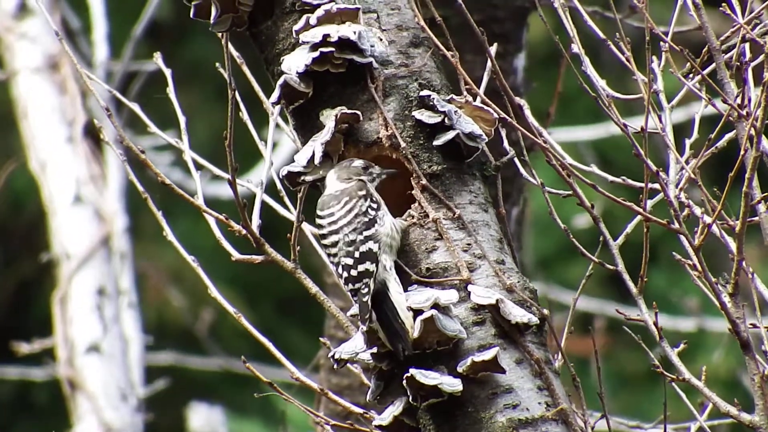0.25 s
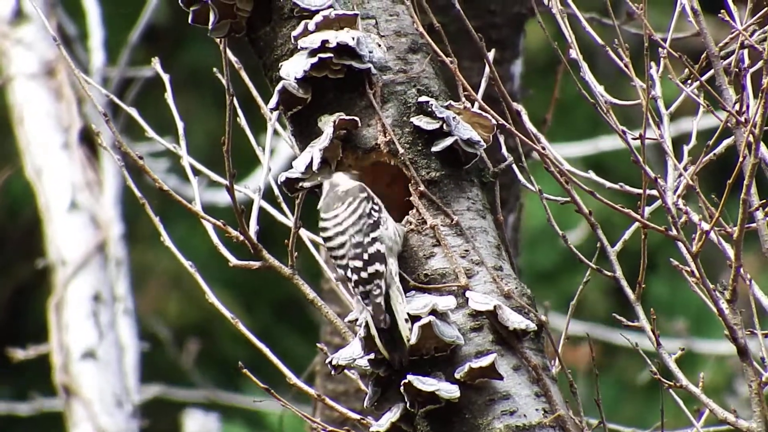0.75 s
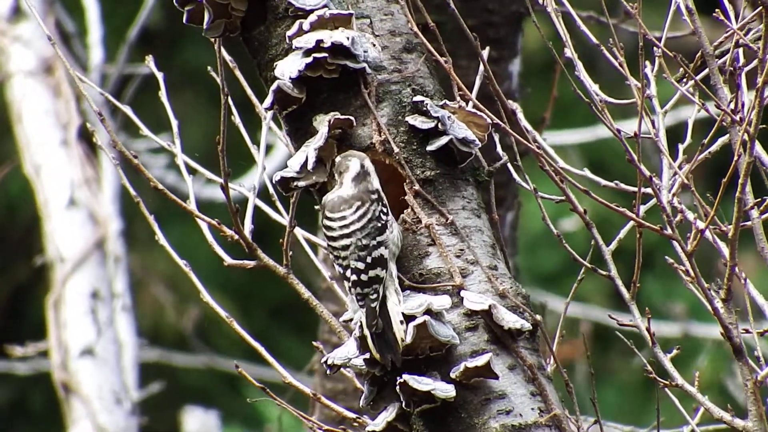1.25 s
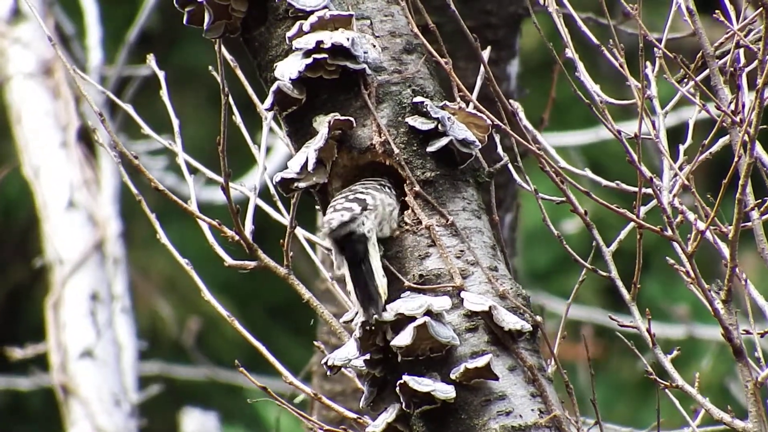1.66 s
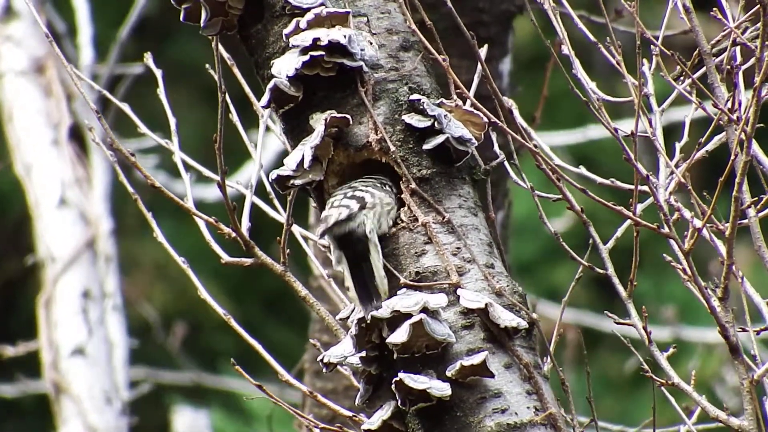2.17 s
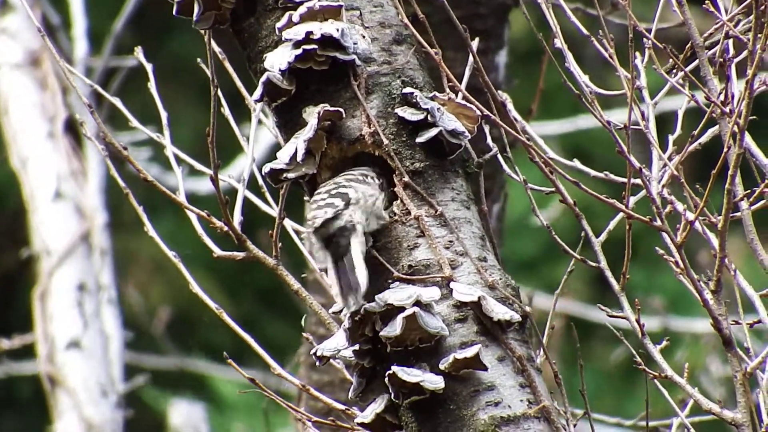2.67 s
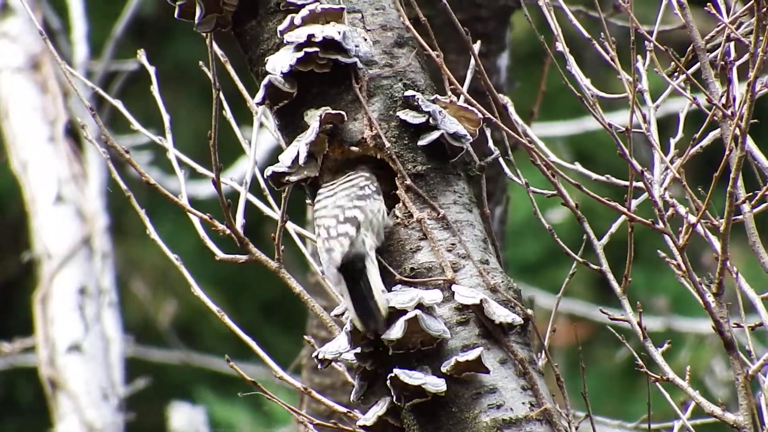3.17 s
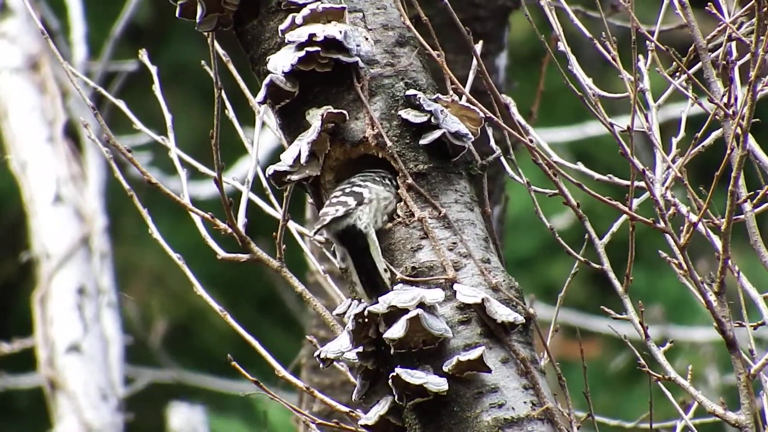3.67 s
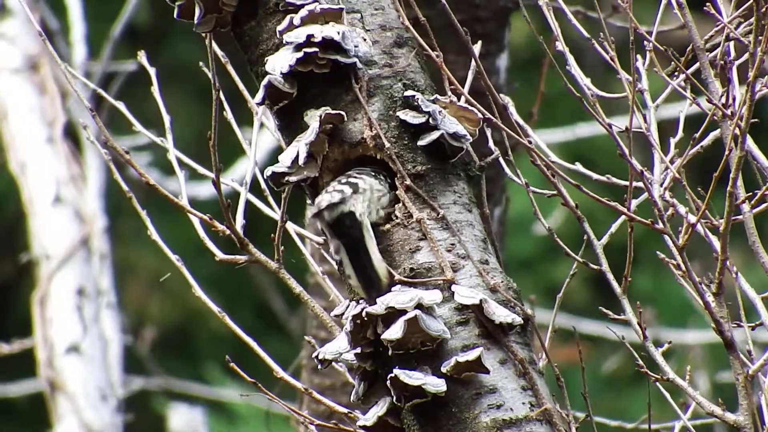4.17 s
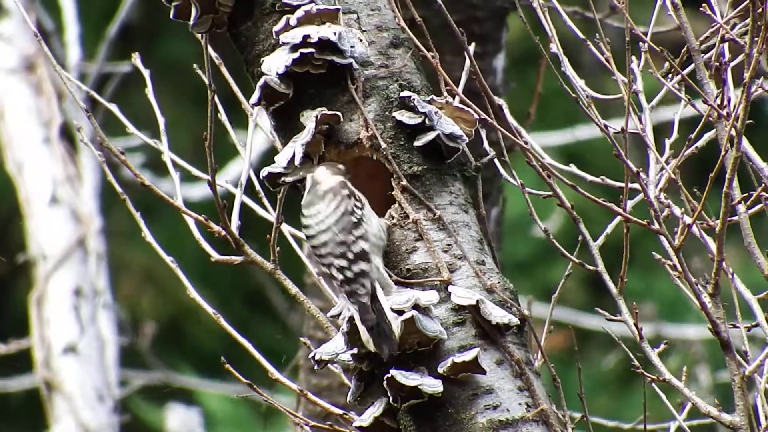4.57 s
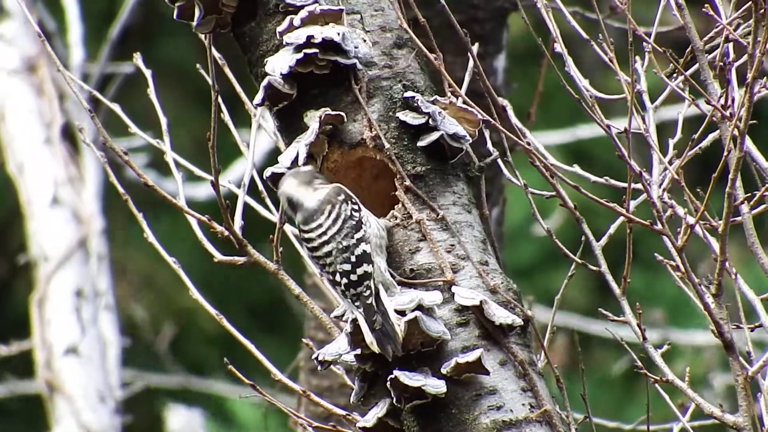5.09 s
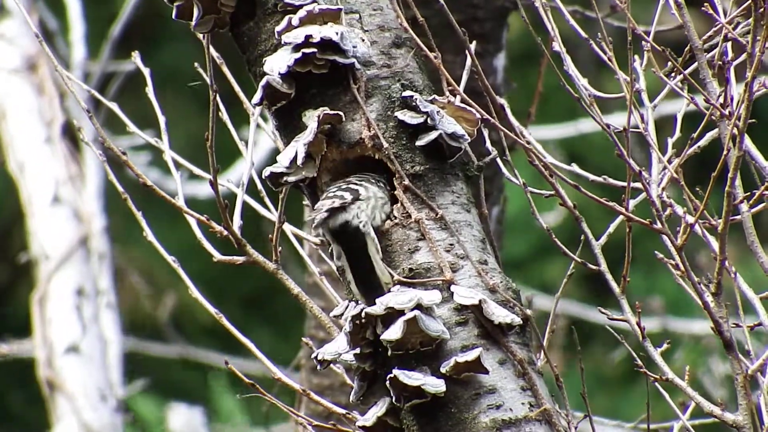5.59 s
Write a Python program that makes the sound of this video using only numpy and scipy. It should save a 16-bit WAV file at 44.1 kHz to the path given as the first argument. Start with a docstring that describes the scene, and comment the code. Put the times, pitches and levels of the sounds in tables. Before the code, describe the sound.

Outdoors among trees, small birds whistle, chirp and buzz throughout over a steady, slightly growing rush, with blurred distant birdsong behind. Light wind flutters and thuds at the microphone, mostly around two to three seconds. A small woodpecker is nearly silent until about five seconds, when several soft, hollow knocks come in a quick uneven cluster with faint claw scrapes. The stereo sound is dull on top, with slight hiss.

```python
"""Songbirds twitter among the trees over a steady outdoor rush, and a light breeze buffets the microphone ports.
A small woodpecker knocks a few times on the rim of its hole in a soft, hollow trunk, its claws scraping bark.
Bird notes are gliding sines, knocks are struck trunk modes, and rush, breeze and scrapes are shaped noise.
The camera's sound is dull above 4 kHz, has two narrow notches and a faint hiss of its own."""
import sys
import numpy as np
from scipy import signal
from scipy.fft import rfft, irfft, next_fast_len
from scipy.io import wavfile
from scipy.ndimage import map_coordinates

SR = 44100
rng = np.random.default_rng(int(sys.argv[2]) if len(sys.argv) > 2 else 0)


def unload_audio(sound):
    """Save the sound as a 16-bit wav file, at the path given as the first command line argument."""
    columns = np.transpose(np.atleast_2d(sound))
    # keep every value between -1 and 1, then stretch to whole-number steps
    steps = np.round(np.clip(columns, -1, 1) * 32767)
    wavfile.write(sys.argv[1], SR, steps.astype(np.int16))


N = 257632
TIME = np.arange(N) / SR


def undb(db):
    """Decibels to gain."""
    return 10 ** (np.asarray(db) / 20)


def unit(x):
    """Scale to rms 1."""
    return x / np.sqrt(np.mean(x ** 2) + 1e-18)


def colour(x, points):
    """Filter by a spectrum of (Hz, dB) points, joined by straight lines over log frequency."""
    hz, db = np.transpose(points)
    size = next_fast_len(x.shape[-1] + 2048)
    bins = np.maximum(np.fft.rfftfreq(size, 1 / SR), 1)
    gain = undb(np.interp(np.log(bins), np.log(hz), db))
    return irfft(rfft(x, size) * gain, size)[..., :x.shape[-1]]


def walk(rate, size=N):
    """Smooth random wandering with a spread near 1, through `rate` random steps a second."""
    steps = rng.standard_normal(2048)
    return map_coordinates(steps, [np.arange(size) * rate / SR], order=2, mode="wrap")


def add(track, s, sound):
    """Mix a sound into a track at a time in seconds."""
    i = max(int(s * SR), 0)
    track[i:i + len(sound)] += sound[:max(N - i, 0)]


def woods(x, t60, wet_db, gap_s):
    """Trunks scatter a fading cloud of echoes that reaches both ports nearly alike."""
    t = TIME[:SR]
    # the echoes build up over the gap, then fade by 60 dB in t60 seconds
    fade = undb(-60 * t / t60) * (1 - np.exp(-(t / gap_s) ** 2))
    mid, side = rng.standard_normal((2, SR)) * fade / np.sqrt(np.sum(fade ** 2))
    echoes = [signal.fftconvolve(x, mid + sign * 0.12 * side)[:N] for sign in (1, -1)]
    return x + undb(wet_db) * np.array(echoes)


def progress(length):
    """Run from 0 to 1 over a length in seconds."""
    return np.linspace(0, 1, int(length * SR))


def note(glide, db, trill_hz, waver=0.0079, flutter_db=2.5, uneven=0.206):
    """One bird note: a sine on a pitch path; the deeper its trill, the more it pulses."""
    trill_rate_hz, trill_pulse_db_per_hz = 68, 0.0115
    edge_s = 0.0068  # attack and release
    size = len(glide)
    rate = trill_rate_hz * (1 + uneven * walk(49.4, size))
    trill = trill_hz * np.sin(2 * np.pi * (rng.random() + np.cumsum(rate) / SR))
    hz = glide * (1 + waver * walk(244.0, size)) + trill
    edges = signal.windows.tukey(size, min(2 * edge_s * SR / size, 1))
    # the note dips wherever the trill lifts its pitch
    swell = edges * undb(db + flutter_db * walk(108, size) - trill_pulse_db_per_hz * trill)
    return swell * np.sin(2 * np.pi * np.cumsum(hz) / SR)


def songbirds(pan_db=-3.0):
    """Arched calls, gently bowed whistles and straight buzzes, all echoing among the trees."""
    # Arched calls. Each row: start in seconds, length in seconds, top in Hz,
    # opening level in dB, closing level in dB (both as at the foot pitch).
    arches = [(1.143, .146, 5600, -42, -43.5), (1.472, .178, 6700, -39, -47.5)]
    # Every arch leaps up, climbs on slowly and drops back.
    # Each row: share of its length, share of its rise from foot to top.
    arch_shape = [(0, 0.07), (.09, .52), (.21, .69), (.54, 1), (.74, .9), (.85, .37), (1, 0.026)]
    # Slurred whistles. Each row: start in seconds, length in seconds, first Hz, last Hz, level in dB.
    whistles = [(0, 0.023, 3900, 3720, -41), (0.092, 0.099, 4130, 4260, -47.5),
                (0.309, 0.069, 4390, 4030, -43.5), (0.464, 0.053, 3530, 3595, -43),
                (1.704, .075, 4300, 5350, -46), (2.035, 0.042, 3400, 3400, -46.5),
                (2.427, 0.069, 3090, 3200, -48.5), (2.507, 0.1475, 3220, 3396, -42),
                (2.712, 0.063, 2865, 3640, -40), (2.777, 0.092, 3810, 4060, -43.5),
                (3.214, 0.057, 4350, 4170, -47.5), (3.294, .092, 4450, 4190, -41),
                (3.381, 0.044, 4300, 3670, -42), (3.76, 0.153, 4220, 4510, -48),
                (4.82, .05, 4174, 3570, -41.5), (4.86, .24, 3790, 4370, -46.5),
                (5.102, 0.25, 4610, 4460, -44.5), (5.359, 0.081, 3555, 4354, -42.5),
                (5.653, 0.099, 3666, 4330, -42.5)]
    # Buzzy trills. Each row: start in seconds, length in seconds, first Hz, last Hz, level in dB.
    buzzes = [(.185, 0.064, 4270, 4030, -46.5), (1.777, 0.14, 4090, 4130, -45),
              (1.798, 0.079, 3460, 3160, -43), (2.288, 0.069, 3565, 3800, -47.5),
              (2.773, 0.14, 3450, 3406, -47.5), (2.982, 0.078, 4110, 4920, -45),
              (3.883, 0.2, 3990, 4240, -48.5), (4.202, .22, 3030, 3460, -51),
              (4.471, .12, 3755, 4760, -45.5), (4.647, 0.11, 3875, 3650, -46),
              (4.928, 0.136, 3610, 3470, -49), (5.444, 0.16, 4136, 4050, -47.5)]
    arch_foot_hz, arch_trill_hz = 2310, 61
    arch_db_per_hz = -.0003  # the call weakens as it climbs
    whistle_bow_hz = 91  # lift in the middle of a note
    whistle_trill_hz_per_s = 670  # the longer a whistle, the deeper its trill
    buzz_trill_hz = 293  # depth

    out = np.zeros(N)
    for s, length, top, opening_db, closing_db in arches:
        u = progress(length)
        rise = (top - arch_foot_hz) * np.interp(u, *np.transpose(arch_shape))
        db = opening_db + (closing_db - opening_db) * u + arch_db_per_hz * rise
        add(out, s, note(arch_foot_hz + rise, db, arch_trill_hz))
    for s, length, first, last, db in whistles:
        u = progress(length)
        glide = first + (last - first) * u + whistle_bow_hz * np.sin(np.pi * u)
        add(out, s, note(glide, db, whistle_trill_hz_per_s * length))
    for s, length, first, last, db in buzzes:
        glide = first + (last - first) * progress(length)
        add(out, s, note(glide, db, buzz_trill_hz, waver=0.0261))
    balance = undb(np.array([[pan_db], [-pan_db]]) / 2)
    return woods(out, t60=0.36, wet_db=-2, gap_s=0.0025) * balance


def far_birds(swing_db=6, wander_rate=22):
    """Distant song, blurred by the woods into narrow noise bands that come and go."""
    # Loudness of the distant song. Each row: time in seconds, level in dB on the right, ahead of the echoes.
    chorus = [(0, -56), (.9, -58), (1.8, -56.5), (3.1, -49.5), (3.6, -68), (4.2, -51.5), (5, -50.5),
              (5.8, -62)]
    out = 0
    for hz in np.linspace(3200, 4300, 6):
        band_filter = signal.butter(2, [hz * .965, hz * 1.035], "band", fs=SR, output="sos")
        band = signal.sosfilt(band_filter, rng.standard_normal(N))
        out = out + band * undb(swing_db * np.tanh(walk(wander_rate)))
    song = unit(out) * undb(np.interp(TIME, *np.transpose(chorus)))
    return woods(song, t60=0.21, wet_db=-5.5, gap_s=0.01) * undb(np.array([[-3], [0]]))


def rush(start_db=-45.705, pan_db=-1.85, rise_db=1.59):
    """The even outdoor rush: noise that slowly grows, its ports differing most in the lowest part."""
    # Tone of the rush. Each row: frequency in Hz, relative level in dB.
    rush_spectrum = [(80, -16.5), (160, -10.5), (280, -3), (400, 0.16), (560, -1.15), (800, 1.2),
                     (1600, 0.54), (2050, 2.5), (2400, -3), (3100, -0.4), (3900, -0.94), (4600, -4.5),
                     (12000, -14)]
    # How far the ports differ. Each row: frequency in Hz, side over mid in dB.
    rush_width = [(60, 5), (120, -20), (200, -28), (380, -16), (1300, -21.5), (2400, -24.5), (4400, -10.5)]
    mid, side = colour(rng.standard_normal((2, N)), rush_spectrum)
    ports = unit(mid + np.array([[1], [-1]]) * colour(side, rush_width))
    sway_db = .25 * walk(3)
    balance_db = np.array([[pan_db], [-pan_db]]) / 2
    return ports * undb(start_db + rise_db * TIME / TIME[-1] + sway_db + balance_db)


def breeze(patchy_db=6, flutter_rate=24, lee_db=-5):
    """Each port flutters on its own as the breeze swells, less on the lee side; strong eddies thud as they pass."""
    # Strength of the breeze. Each row: time in seconds, level in dB on the windward (left) port.
    gusts = [(0, -75), (.45, -58.5), (.9, -67), (1.95, -59.5), (2.25, -50), (2.85, -51.5), (3.15, -62.5),
             (4.3, -70.5), (5.84, -75)]
    # The strongest eddies. Each row: start in seconds, length in seconds, level in dB,
    # lean to the left in dB (scaled by nearly nine tenths below).
    eddies = [(0.307, 0.019, -52, -12), (0.417, 0.047, -52, -5), (1.393, .021, -48.5, 21),
              (1.485, 0.023, -54, 19), (2.112, 0.02, -56, 21), (2.311, 0.041, -46, 12),
              (2.395, 0.035, -53, 20), (2.639, 0.027, -55, 0), (3.077, 0.016, -41.5, -6),
              (3.09, 0.051, -48, -8.5), (3.247, 0.02, -45.5, -13), (3.516, 0.022, -52, 14),
              (3.595, 0.018, -57, 20), (3.849, 0.014, -60, 16)]
    # Tone of the turbulence. Each row: frequency in Hz, relative level in dB.
    eddy_spectrum = [(60, -8.5), (130, -1.5), (190, 1.5), (300, 0.5), (420, -8.5), (700, -28), (2000, -55)]
    ports, strength_db = [], np.interp(TIME, *np.transpose(gusts))
    for side, shelter_db in ((0.9, 0), (-0.87, lee_db)):
        air = unit(colour(rng.standard_normal(N), eddy_spectrum))
        out = air * undb(strength_db + shelter_db + patchy_db * np.tanh(walk(flutter_rate)))
        for s, length, db, pan_db in eddies:
            puff = air[int(s * SR):][:int(length * SR)]
            thud = unit(puff * signal.windows.tukey(len(puff), .7))
            add(out, s, undb(db + side * pan_db / 2) * thud)
        ports.append(out)
    return np.array(ports)


def woodpecker(tick_s=0.00066, build_s=.0028):
    """The beak ticks on the bark; the hollow trunk swells into a short, dead knock."""
    # Pecks. Each row: start in seconds, peak level of the knock in dB, level of the beak tick in dB,
    # contact time in seconds; levels are on the right, ahead of the echoes.
    pecks = [(.393, -54, -37, .0004), (4.903, -46, -22, .0004), (4.9473, -30, -20.5, 0.00011),
             (5.0501, -30, -18, 0.00039), (5.104, -43, -42, .0006), (5.201, -30.5, -27, 0.00053),
             (5.2767, -43, -47, 0.0025), (5.796, -57, -33, 0.00037)]
    # Ringing modes of the trunk. Each row: frequency in Hz, relative level in dB, 60 dB decay in seconds.
    trunk_modes = [(166, -14, 0.051), (373, -2, 0.028), (422, 11, 0.015), (446, 3.5, 0.024),
                   (706, -0.5, 0.022)]
    # Tone of the beak tick. Each row: frequency in Hz, gain in dB.
    beak_spectrum = [(1500, -23), (4500, -10), (7800, 10), (12000, -1)]
    out, t = np.zeros(N), TIME[:SR // 8]
    ring = sum(undb(db - 60 * t / t60) * np.sin(2 * np.pi * hz * t) for hz, db, t60 in trunk_modes)
    ring = ring * (1 - np.exp(-(t / build_s) ** 2))
    for s, knock_db, tick_db, contact_s in pecks:
        # a longer contact leaves the upper modes quiet
        push = t * np.exp(-2 * t / contact_s)
        knock = signal.fftconvolve(ring, push)[:len(t)]
        tick = colour(rng.standard_normal(len(t)), beak_spectrum) * np.exp(-t / tick_s)
        add(out, s, undb(knock_db) * knock / np.abs(knock).max() + undb(tick_db) * tick)
    return woods(out, t60=0.29, wet_db=-25, gap_s=.01) * undb(np.array([[-1.5], [0]]))


def claws(grit=1.0):
    """Claws drag over bark: a dense run of tiny, uneven snaps."""
    # Claws shifting on the bark. Each row: start in seconds, length in seconds, level in dB before the fades.
    scrapes = [(4.968, 0.124, -49), (5.106, 0.16, -50.5), (5.427, .15, -51), (5.755, .06, -57)]
    # Tone of the bark. Each row: frequency in Hz, relative level in dB.
    bark_spectrum = [(800, -22), (2500, -6), (5000, 13), (7000, -9), (10000, -17)]
    out = np.zeros(N)
    for s, length, db in scrapes:
        size = int(length * SR)
        strength = rng.standard_normal(size) * np.exp(grit * rng.standard_normal(size))
        snaps = strength * (rng.random(size) < .04)  # one sample in 25 snaps
        scrape = unit(colour(snaps, bark_spectrum)) * signal.windows.tukey(size, .5)
        add(out, s, undb(db) * scrape)
    return out


def scene():
    """Everything that reaches the two ports; sound from the trees arrives at the left one a little earlier."""
    port_lag_s = .000016  # from the left port to the right one
    left, right = songbirds() + far_birds() + rush()
    right = map_coordinates(right, [np.arange(N) - port_lag_s * SR], order=5, mode="nearest")
    return np.array([left, right]) + woodpecker() + claws() + breeze()


def record(dry, hiss_db=-66.0, top_hz=15700):
    """The camera dulls the treble, notches two narrow bands, adds its hiss and cuts the top."""
    # Response of the microphone. Each row: frequency in Hz, gain in dB.
    microphone = [(25, -33), (50, -21), (80, -8.5), (130, -1), (200, 1), (4100, 1), (4400, -5.5),
                  (4700, -7.5), (5050, -15.5), (5600, -19.5), (7000, -31), (8400, -32.5), (10000, -43)]
    # Narrow notches. Each row: centre in Hz, width in Hz.
    notches = [(221, 47), (1102, 125)]
    # Tone of the hiss. Each row: frequency in Hz, relative level in dB.
    hiss_spectrum = [(30, -15), (100, 6.5), (8000, -0.5), (11000, -3), (15500, -8)]
    sound = colour(dry, microphone)
    for hz, width in notches:
        sound = signal.lfilter(*signal.iirnotch(hz, hz / width, fs=SR), sound)
    # each channel hisses on its own, with a little in common
    hiss = colour(rng.standard_normal((2, N)) + 0.24 * rng.standard_normal(N), hiss_spectrum)
    top_cut = signal.ellip(10, .1, 70, top_hz, fs=SR, output="sos")
    return signal.sosfilt(top_cut, sound + undb(hiss_db) * unit(hiss))


dry = scene()
out = record(dry)
unload_audio(out)
```